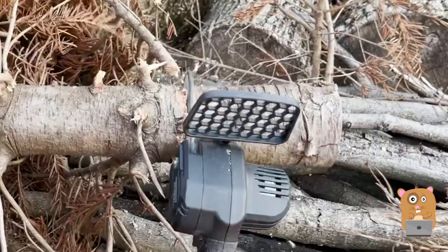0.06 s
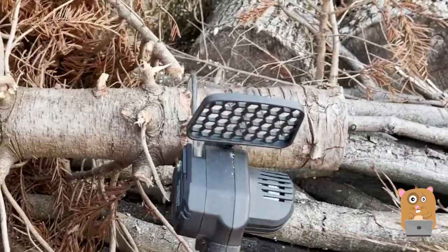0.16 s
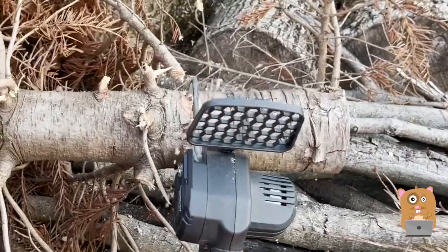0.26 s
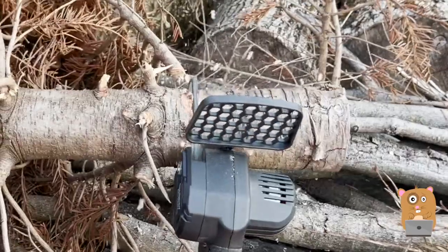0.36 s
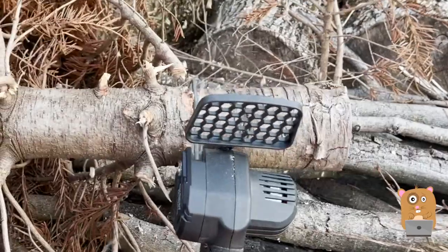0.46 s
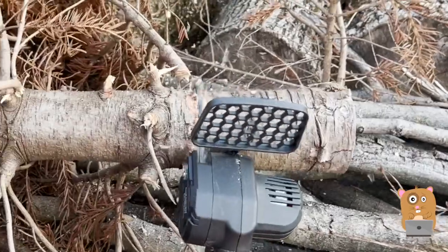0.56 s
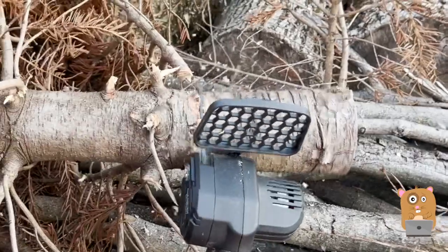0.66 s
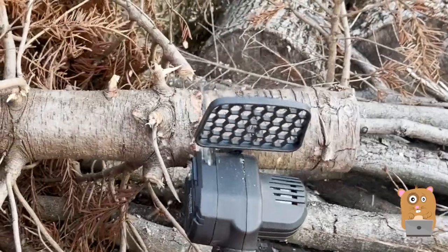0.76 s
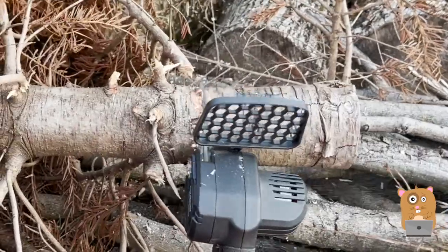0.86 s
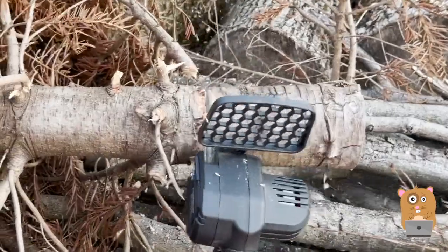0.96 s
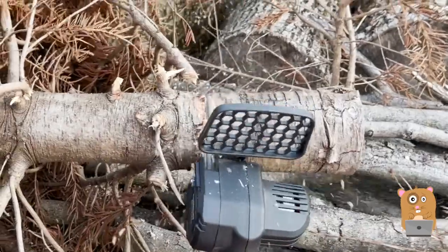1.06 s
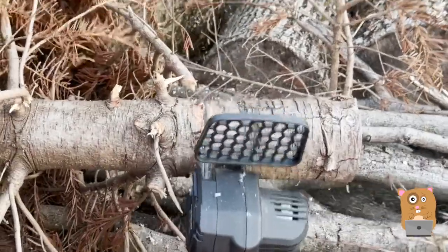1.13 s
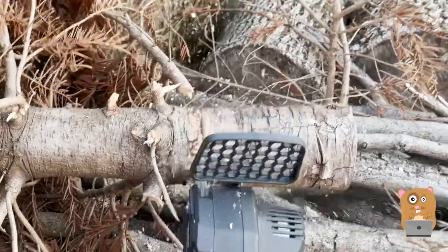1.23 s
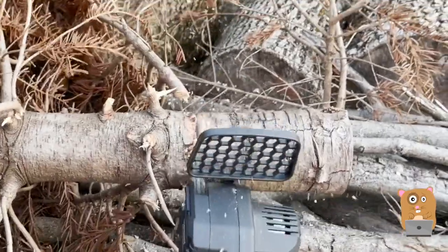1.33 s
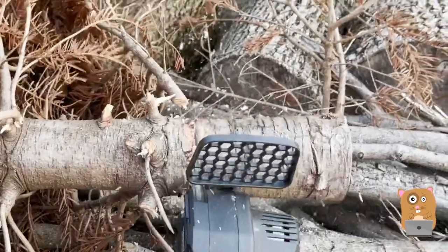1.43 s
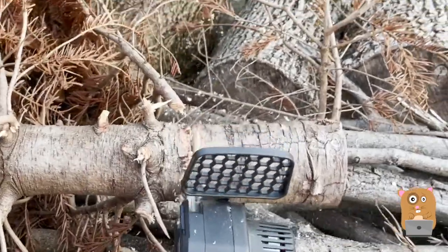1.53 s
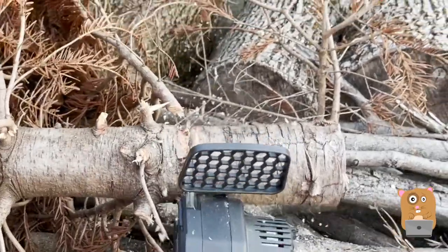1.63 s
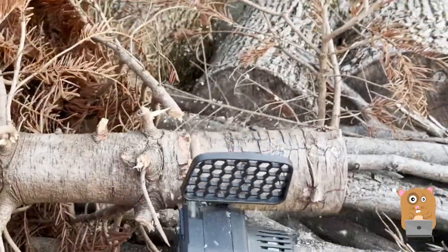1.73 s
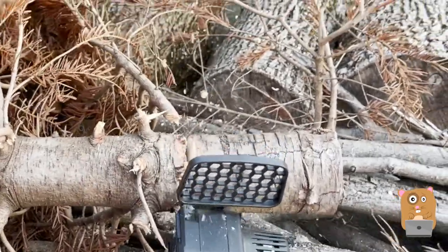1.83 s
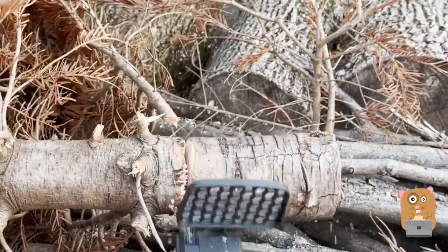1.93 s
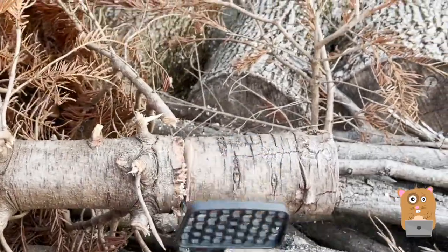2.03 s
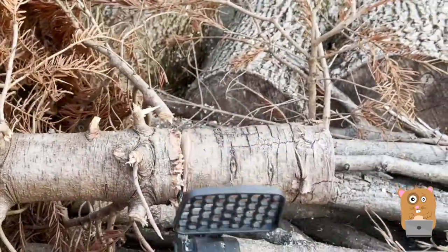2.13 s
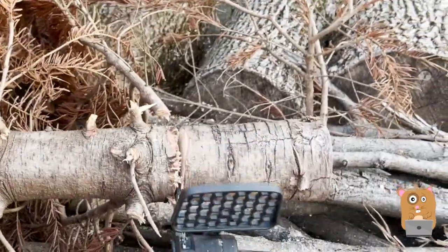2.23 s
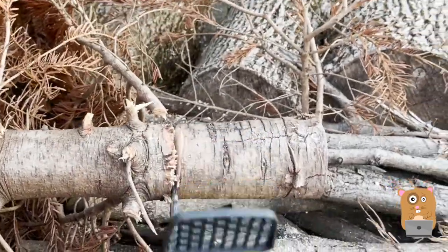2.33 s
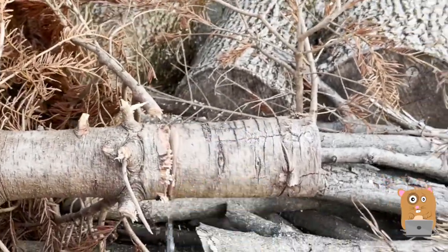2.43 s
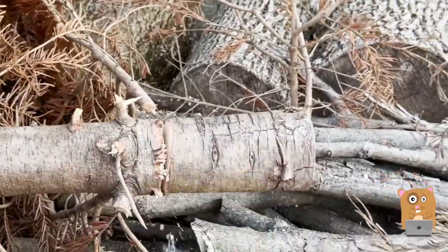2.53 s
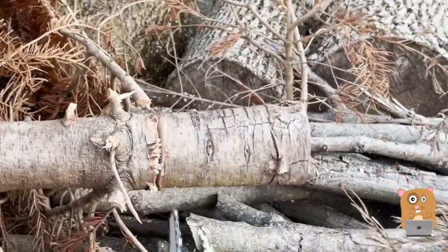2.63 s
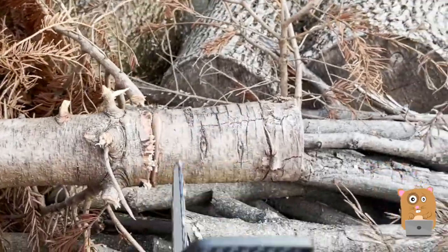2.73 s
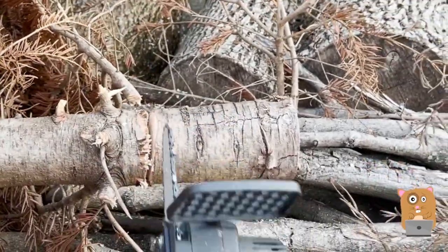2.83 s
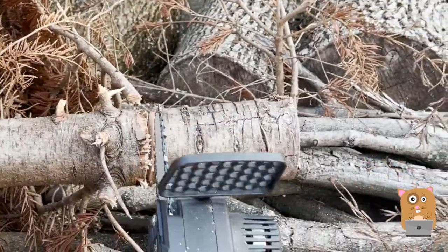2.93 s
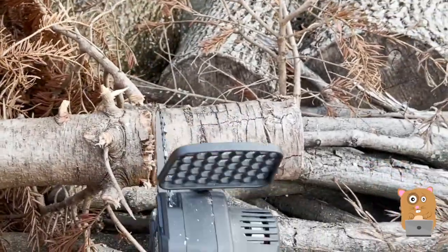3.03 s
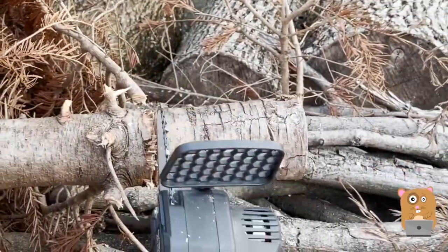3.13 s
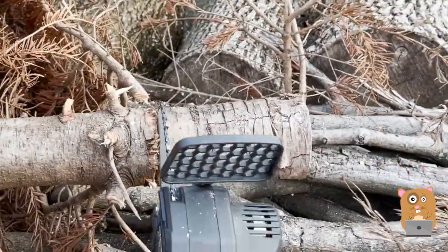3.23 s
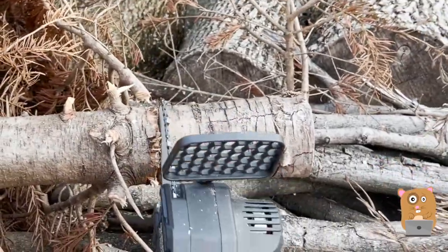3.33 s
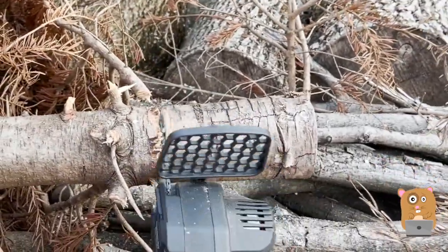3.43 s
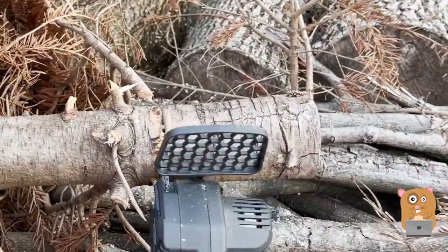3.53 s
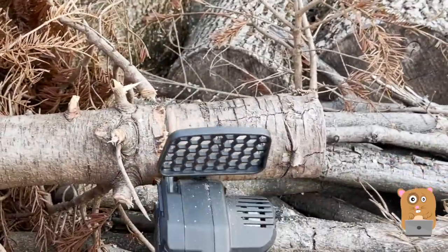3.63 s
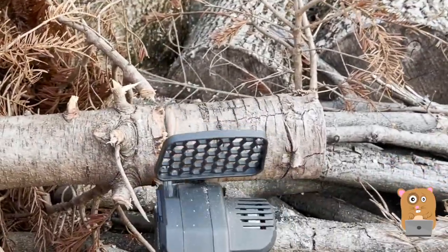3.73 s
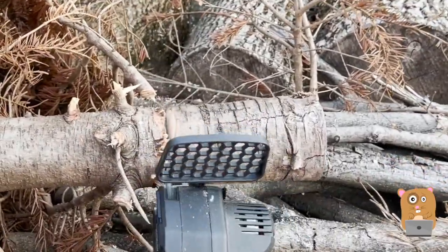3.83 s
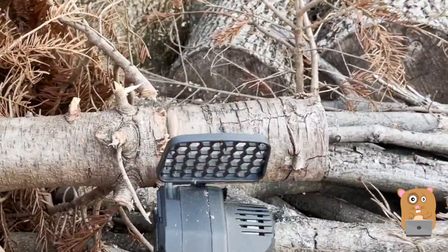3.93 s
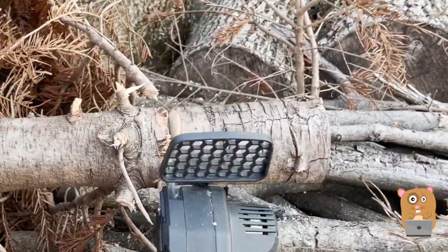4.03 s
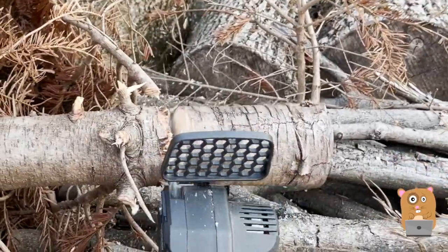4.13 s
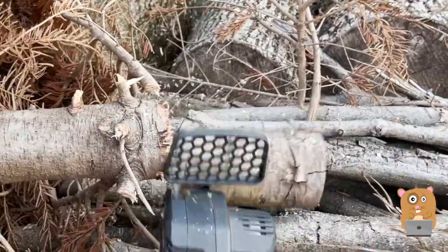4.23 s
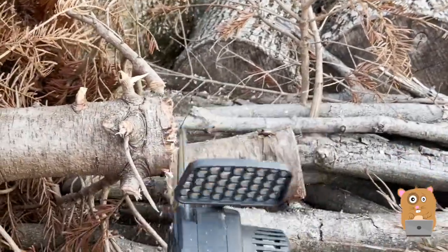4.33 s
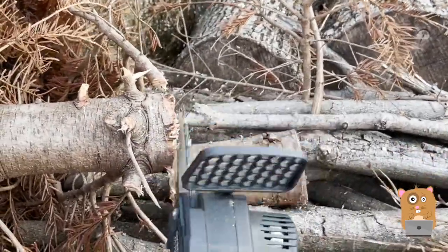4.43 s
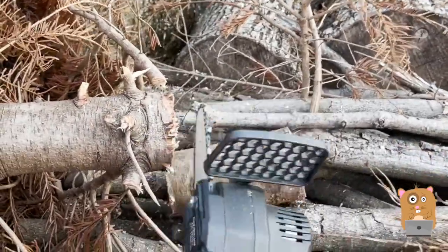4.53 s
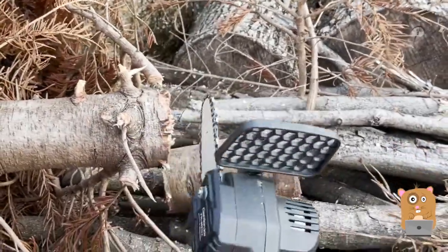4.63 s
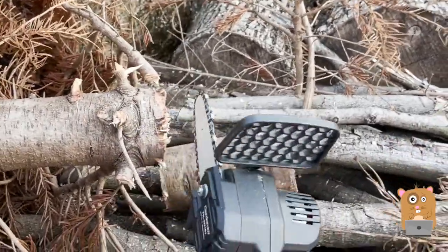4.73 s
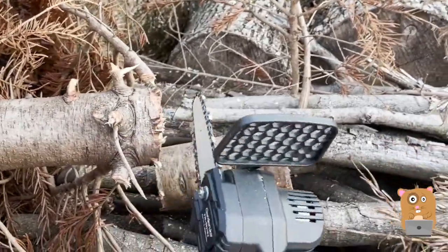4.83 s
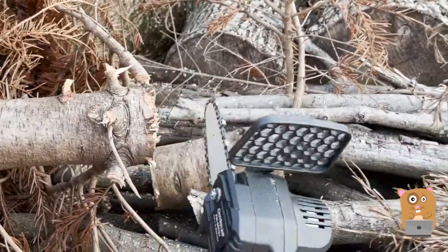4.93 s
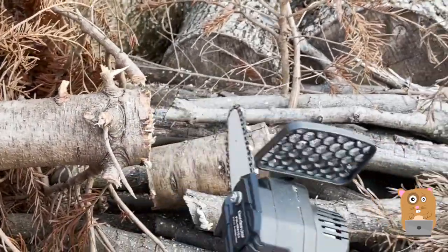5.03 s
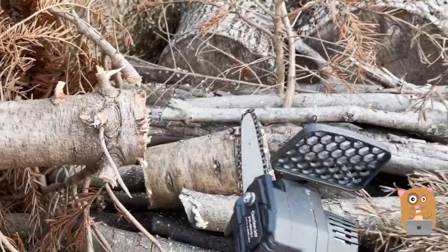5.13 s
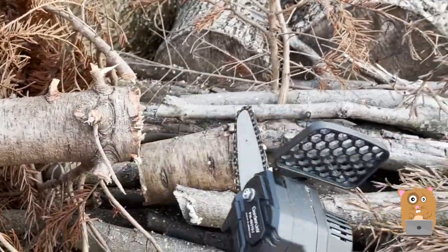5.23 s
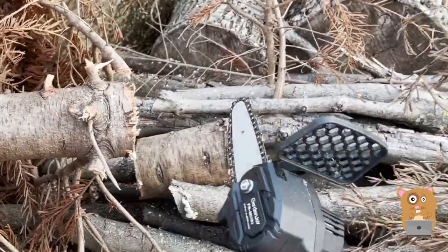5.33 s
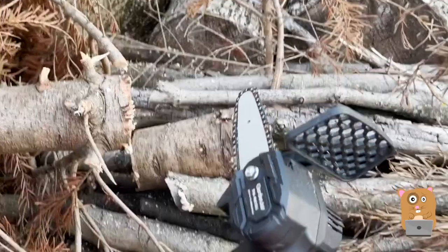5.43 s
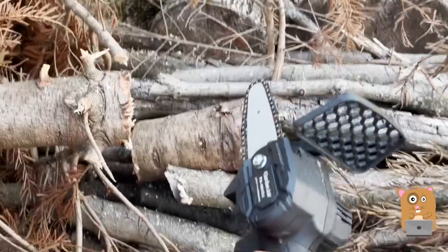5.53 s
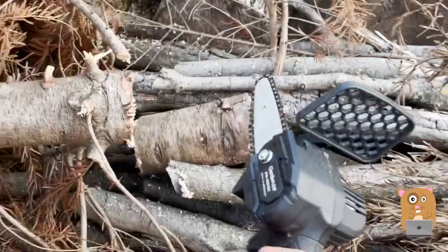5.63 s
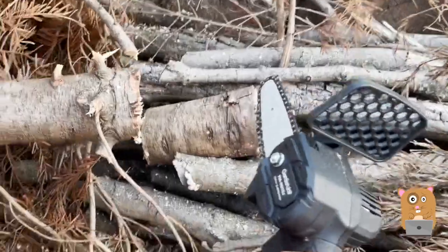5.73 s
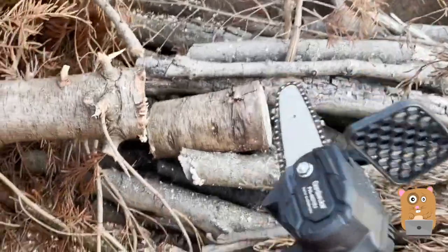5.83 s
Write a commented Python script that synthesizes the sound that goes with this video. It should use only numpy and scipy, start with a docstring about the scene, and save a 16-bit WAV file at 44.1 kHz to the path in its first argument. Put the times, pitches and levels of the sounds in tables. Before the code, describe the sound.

Outdoors, a small electric chainsaw cuts wood, pauses, then cuts briefly again, while gusts thump the microphone and dry twigs crackle.

```python
"""A small battery chainsaw rasps into a log in two bursts, outdoors, close to a phone's microphones.
Its cutters tear off chips, the log drones, the steel bar rings and the gears whine under the load.
Mostly between the bursts, dry twigs and chips tick and rustle. Gusts thump and flutter right on
the two microphone ports, and a faint hiss swells with the breeze behind it all."""
import sys
import numpy as np
from scipy import signal
from scipy.fft import rfft, irfft, next_fast_len
from scipy.io import wavfile
from scipy.ndimage import uniform_filter1d, map_coordinates

SR = 44100
rng = np.random.default_rng(int(sys.argv[2]) if len(sys.argv) > 2 else 0)


def int16_out(signal):
    """Quantize to a 16-bit WAV file."""
    q = np.round(np.clip(np.atleast_2d(signal).T, -1, 1) * 32767)
    wavfile.write(sys.argv[1], SR, q.astype(np.int16))


N = 259308

# The saw, close up. Levels in all tables are relative.
# runs of the chain, the last free once the log parts:
# start/s, stop/s, rasp level/dB, drone over rasp/dB, rumble over rasp/dB
SAW_RUNS = [(-.3, 1.782, -19.5, -11.5, -18), (3.611, 4.17, -18.5, -13, -24.5), (4.1, 4.398, -22, -18, -29)]
# hard bites of a cutter: t/s, level/dB, log knock over it/dB
BITES = [(.0356, 3, 7.5), (.0563, -10, -10), (.0618, 2.5, -10), (.077, -22, 0), (.1272, 3, 7.5),
         (.1594, -14, 0), (.202, -2.5, -1), (.2538, 0, 8), (.2798, -8, -10), (.3017, -21, -15),
         (.344, -21, 12), (.3814, -0.5, 2.5), (.434, -10, -5), (.5324, -4, 3), (.5693, -1.5, 15),
         (.684, -12, 17), (.74, -14, 22), (.95, -16, 21), (1.02, -1, 6.5), (1.1666, -1, -.5),
         (1.229, -1.5, 10), (1.2394, -5, 14), (1.3374, -1, 3), (1.448, -4.5, 13), (1.5259, -12, 11),
         (1.6385, -4, 16), (1.643, -14, 26), (1.6614, -18, -3), (1.7006, -2.5, 4), (1.759, -4.5, 13.5),
         (1.7779, -18, -3.5), (1.806, -19, 24.5), (3.655, -16, 6), (3.7005, -8, 8), (3.715, -18, 22),
         (3.7483, 3, 4), (3.773, -10, 12), (4.068, -7, 13), (4.1415, -3, 2), (4.151, -2, 6.5),
         (4.1844, 1.5, -4), (4.197, -1, -7), (4.2243, -7, -12), (4.2901, -10, -5), (4.388, -7, 4)]
# chain and chips: f/Hz, level/dB
RASP_SPECTRUM = [(350, -45), (650, -12), (1300, -6), (2000, -4), (2800, -9), (4300, -5.5), (6000, -7),
                 (7100, -8.5), (8500, -2.5), (9200, -3.5), (10800, 2.5), (12000, -7.5), (13000, -19.5),
                 (15600, -18)]
# the pile shaking under the log: f/Hz, level/dB
RUMBLE_SPECTRUM = [(120, -18.5), (300, -4.5), (480, 0.5), (650, -17), (1000, -34)]
# resonances of the log with the bar in it: f/Hz, width/Hz, level/dB
LOG_MODES = [(845, 240, 6), (1250, 1700, -6), (1930, 540, -1)]
# resonances of steel bar and housing: f/Hz, width/Hz, level/dB
BAR_MODES = [(2075, 77, 3.5), (3390, 78, -2), (4780, 68, -24), (6400, 100, -7), (8600, 85, 4.5),
             (10600, 100, 1)]
# gear whine sagging with the load, one list a burst: t/s, f/Hz, level/dB
GEAR_WHINE = [
    [(.1, 3930, -45), (.3, 4080, -52), (.52, 4260, -39), (.62, 4060, -31), (.78, 4320, -45),
     (.88, 4660, -27), (.96, 4400, -35), (1.02, 4560, -30), (1.06, 4300, -32), (1.17, 4350, -26.5),
     (1.22, 4100, -28), (1.35, 4310, -35.5), (1.6, 4200, -31), (1.8, 4155, -47)],
    [(3.66, 4500, -40), (3.8, 4320, -42), (4.0, 4360, -36), (4.2, 4670, -36), (4.4, 4400, -53)],
]

# twig and chip ticks: t/s, level/dB, woody part over it/dB
TICKS = [(1.8894, -31, -3), (1.899, -38, -2), (1.9208, -25.5, -6), (1.9374, -40, 19), (1.9674, -37, 2),
         (1.994, -34, 9), (2.031, -34, 14), (2.041, -44, 15), (2.2937, -24.5, -3), (2.3085, -34, 21),
         (2.3135, -35, 21), (2.357, -29, 12), (2.394, -29, 8), (3.0634, -44, 4), (3.133, -29, -5),
         (3.186, -27, 0), (3.2437, -31, 8), (3.2685, -33.5, 26), (3.4074, -24.5, 13), (3.4446, -27.5, 23.5),
         (3.491, -32, -5), (3.5356, -21, -12), (3.605, -24, 2), (4.4723, -31, -9), (5.7974, -52, 32),
         (5.845, -36, 1), (5.8614, -32, 23), (5.8704, -33, 31)]
# dry twigs brushing: t/s, length/s, level/dB, woody level/dB
BRUSHES = [(1.895, 0.054, -50.5, -56), (1.96, 0.049, -52, -54), (2.03, 0.0098, -46, -45),
           (2.305, 0.016, -44, -48), (2.335, 0.078, -45.5, -62), (3.05, .03, -55, -69),
           (3.24, 0.043, -49.5, -56), (3.408, 0.036, -37, -47), (3.443, 0.027, -36, -43.5),
           (3.485, 0.028, -41, -51.5), (3.58, .02, -50, -52), (5.835, 0.037, -44.5, -41)]
# how fast the brushing and its woody part come and go: slope/(dB/s)
BRUSH_EDGES = [
    [900],
    [1200],
]
# snapping twigs: f/Hz, level/dB
TWIG_SPECTRUM = [(600, -18), (1400, 1), (2200, -4.5), (3200, 4.5), (6000, 5.5), (9000, 7), (11000, 16),
                 (13000, -9), (15600, -18)]
# resonances of dry sticks: f/Hz, width/Hz, level/dB
STICK_MODES = [(830, 260, -6), (1400, 520, -2.5), (2140, 200, -2), (3040, 250, -5.5)]

# steady wind on the microphone ports: t/s, thump level/dB, flutter level/dB
STEADY_WIND = [(0, -58, -77), (1.2, -53.5, -73), (1.9, -48, -62), (2.28, -49.5, -59), (2.65, -53, -69),
               (3.46, -37.5, -63), (3.86, -45, -56), (4.5, -41, -47), (5.1, -49, -63), (5.42, -50, -72),
               (5.7, -37, -66), (5.88, -50, -64)]
# gusts: t/s, length/s, thump level/dB, flutter level/dB
GUSTS = [(0.08, 0.17, -52, -68), (0.79, 0.06, -39.5, -57), (1.04, 0.081, -45, -60), (1.22, 0.055, -40, -67),
         (1.45, 0.11, -52, -59), (1.62, 0.23, -44, -43), (1.93, 0.16, -39, -51.5),
         (2.17, 0.049, -56, -59.5), (2.34, 0.036, -40.5, -59), (2.39, 0.098, -32, -40.5),
         (2.52, 0.025, -36, -45.5), (2.595, 0.1, -31, -44), (2.73, 0.015, -28.5, -61),
         (2.77, 0.067, -32, -35.5), (2.9, 0.098, -29.5, -36.5), (3.03, 0.03, -40, -57),
         (3.075, 0.026, -46, -45), (3.155, 0.075, -29, -37.5), (3.23, 0.049, -29, -39),
         (3.315, 0.025, -41, -44), (3.37, 0.066, -27.5, -45.5), (3.46, 0.04, -40, -48),
         (3.53, 0.06, -37, -38), (3.62, 0.064, -32.5, -43.5), (3.79, 0.04, -38, -51),
         (3.88, 0.06, -34, -45), (3.98, 0.07, -29, -51), (4.09, 0.11, -27, -45), (4.28, 0.06, -33.5, -46),
         (4.4, 0.052, -31, -51), (4.52, 0.071, -50, -56), (4.66, 0.05, -32.5, -50), (4.74, 0.023, -36, -41),
         (4.79, 0.019, -29, -55), (4.83, 0.08, -31.5, -40), (4.97, 0.095, -41, -38),
         (5.1, 0.024, -26.5, -30), (5.15, 0.045, -24.5, -36), (5.21, 0.067, -30, -48),
         (5.3, 0.073, -33.5, -55), (5.47, 0.025, -36, -63), (5.54, 0.15, -30, -32), (5.7, 0.036, -38, -52),
         (5.8, 0.03, -41, -66)]
# how fast thump and flutter come and go: slope/(dB/s)
GUST_EDGES = [
    [600],
    [2006],
]
# deep wind pressure: f/Hz, level/dB
THUMP_SPECTRUM = [(12, -44), (20, -22), (47, 5), (70, 6), (199, -4), (260, -11), (340, -13), (570, -120)]
# fluttering wind pressure: f/Hz, level/dB
FLUTTER_SPECTRUM = [(110, -10), (180, 3.5), (354, 1.5), (492, -9.5), (613, -11), (1600, -33.5), (2080, -55),
                    (3520, -120)]
# eddies that slap the ports: t/s, level/dB, slowing time/s, t60/s
SLAPS = [(2.397, -28.5, 0.0013, 0.057), (2.4194, -24.5, 0.0032, 0.087), (2.439, -13.5, 0.019, 0.018),
         (2.4578, -18.5, 0.0024, 0.061), (2.489, -31.5, .0012, 0.067), (2.535, -30.5, 0.0015, 0.078),
         (2.6016, -30.5, 0.0013, 0.08), (2.6331, -23, 0.0013, 0.16), (2.647, -35, 0.003, 0.13),
         (2.686, -35, 0.0016, 0.11), (2.737, -31, 0.00086, 0.17), (2.774, -26, 0.0036, 0.1),
         (2.782, -23.5, 0.0042, 0.18), (2.7982, -21.5, 0.0023, .07), (2.829, -24, 0.019, 0.02),
         (2.919, -17, 0.0022, 0.039), (2.9522, -18.5, 0.0014, 0.017), (2.98, -25.5, 0.0019, 0.084),
         (3.082, -29.5, 0.0012, 0.083), (3.1622, -16.5, 0.0029, 0.015), (3.1688, -23, 0.0026, .04),
         (3.2035, -12.5, 0.00094, 0.036), (3.2681, -26, 0.0018, .08), (3.3272, -32.5, 0.0013, 0.041),
         (3.3768, -13, 0.001, 0.027), (3.4093, -23, 0.0013, 0.052), (3.6298, -24.5, 0.0018, 0.16),
         (3.911, -23, 0.0016, 0.093), (4.0067, -22.5, 0.0017, 0.077), (4.2201, -20, 0.0013, 0.02),
         (4.297, -16.5, 0.0024, 0.078), (4.4118, -25, 0.0011, 0.12), (4.5349, -27, 0.0023, 0.011),
         (4.676, -33.5, 0.0017, 0.11), (4.7479, -28.5, 0.0012, .11), (4.7928, -36.5, 0.007, 0.14),
         (4.845, -25, 0.0026, 0.06), (4.8832, -29.5, 0.0016, 0.084), (4.897, -25.5, 0.0015, 0.066),
         (4.9227, -26, 0.001, 0.044), (4.98, -32, .003, .05), (5.025, -23, 0.014, 0.033),
         (5.045, -21, 0.0012, 0.087), (5.1115, -16, .0017, 0.022), (5.1672, -19, .002, 0.015),
         (5.218, -28.5, .002, .07), (5.551, -22, 0.0019, 0.093), (5.5926, -15.5, 0.0024, .13),
         (5.579, -30, .003, 0.024), (5.618, -15, 0.001, 0.0087), (5.6362, -13.5, .0017, 0.0037),
         (5.6465, -13.5, 0.0016, 0.028), (5.6715, -14, .0019, 0.017)]

# background hiss swelling with the breeze: t/s, level/dB
BREEZE = [(0, -55.5), (1.9, -53), (3.1, -50.5), (4.5, -51), (5.5, -48.5), (5.88, -51)]
# background hiss shared by both ports, cut off near 12 kHz by the phone's audio coding: f/Hz, level/dB
SHARED_HISS_SPECTRUM = [(300, 13), (800, -23), (2200, 3.5), (4000, -3.5), (7000, -2), (9000, 0),
                        (10500, -1.5), (11600, -3.5), (11900, -60)]
# each port's own hiss: f/Hz, level/dB
PORT_HISS_SPECTRUM = [(300, 6.5), (1200, 3), (3000, -4), (7000, -9), (9000, -35), (12200, -60)]

# phase shift across the phone's body: f/Hz, lead of the left port/cycles
PORT_LEAD = [(0, 0), (2200, 0), (3100, .15), (5000, .05), (6800, 0), (7500, .13), (8700, 0), (10200, -.5),
             (11800, -1), (12600, -1), (13300, -1.5), (14200, -1.5), (15000, -2), (22050, -2)]
# balance of the ports: f/Hz, left over right/dB
PORT_TILT = [(200, 1.5), (700, -0.5), (1300, -2.5), (2400, 1.5), (4400, 2.5), (7000, 2), (8500, 0)]
# scattered sound, in which the ports differ: f/Hz, level/dB
SCATTER_SPECTRUM = [(100, -22), (400, -12.5), (1000, -11), (1900, -28), (3000, -4.5), (5000, -9),
                    (6200, -16), (7300, 0), (8500, -36.5), (9300, 3.5), (10200, -9), (11500, -1),
                    (13600, -30)]

SPIN_UP_S, COAST_S, COAST_LAW = 0.046, 0.081, 1.68  # the chain slows to rest by this power
NICKS_PER_S, NICK_DB, STEEL_DB = 130, 3, -16.5  # levels against the rasp
SMALL_EDDY_HZ, SMALL_EDDY_S, EDDY_LAW = 1146, .0015, 0.318  # a slower eddy starts lower, by this power
LOW_CUT_HZ, TOP_HZ = 36.2, 15900  # the phone's band


def saw():
    """Chips tear off in a dense spray that swells with every cutter; log, pile and bar sound with it."""
    swell = .76 + .42 * abs(cutter_throb(per_s=58, scatter=.2, t60=.045))
    spray = amp(0.76 * wobble(1500) + 1.2 * wobble(200)) * noise()
    rasp = coloured(wood_grain(swell * spray, depth_db=1.46), RASP_SPECTRUM)
    drone = unit(ringing(swell * amp(1.7 * wobble(29.8)) * noise(), LOG_MODES))
    rumble = coloured(swell * amp(0.79 * wobble(18)) * noise(), RUMBLE_SPECTRUM)
    steel = amp(STEEL_DB) * unit(ringing(swell * noise(), BAR_MODES))
    chain_gain, log_gain, pile_gain = chain_gains()
    return chain_gain * (rasp + steel + nicks()) + log_gain * drone + pile_gain * rumble + bites()


def chain_gains():
    """Gains of rasp, drone and rumble: the chain spins up, holds and coasts to rest."""
    gains, t = np.zeros((3, N)), np.arange(N) / SR
    for start, stop, db, drone_db, rumble_db in SAW_RUNS:
        spin_up = 1 - np.exp(-np.maximum(t - start, 0) / SPIN_UP_S)
        coast = np.clip(1 - (t - stop) / COAST_S, 0, 1) ** COAST_LAW
        gains = np.maximum(gains, amp(db + np.c_[[0, drone_db, rumble_db]]) * spin_up * coast)
    return gains * amp(0.13 * wobble(6.05))


def cutter_throb(per_s, scatter, t60):
    """Uneven swells: each cutter meets the wood late or early, hard or soft."""
    lateness, force_db = rng.standard_normal((int(N / SR * per_s), 2)).T
    at = (np.arange(len(lateness)) + scatter * lateness) * SR / per_s
    kicks = np.bincount(np.clip(at, 0, N - 1).astype(int), amp(force_db), N)
    t = np.arange(SR // 10) / SR
    shape = amp(-60 * t / t60) * (1 - np.exp(-t / 0.0041))
    return unit(signal.fftconvolve(kicks, shape)[:N])


def wood_grain(x, depth_db):
    """Patches of pitch and time grow louder or softer as the grain of the wood changes."""
    spectra = signal.stft(x, nperseg=512)[2]
    patches = uniform_filter1d(rng.standard_normal(spectra.shape), size=3, axis=0)
    patches = uniform_filter1d(patches, size=5, axis=1)
    return signal.istft(spectra * amp(depth_db * unit(patches)), nperseg=512)[1][:N]


def bites():
    """A cutter bites hard: a crack, and a knock that rings the log."""
    crack, knock = bursts(BITES, rise=0.004, t60=0.017)
    return crack * coloured(noise(), RASP_SPECTRUM) + ringing(knock * noise(), LOG_MODES)


def nicks():
    """Single teeth nick the wood in short random cracks."""
    kicks = (rng.random(N) < NICKS_PER_S / SR) * amp(NICK_DB + 1.52 * noise())
    t = np.arange(SR // 50) / SR
    envelope = signal.fftconvolve(kicks, amp(-60 * t / 0.007))[:N]
    return envelope * coloured(noise(), RASP_SPECTRUM)


def gear_whine():
    """The gear mesh sings, rough in pitch and strength."""
    hz = np.maximum(curve(GEAR_WHINE), 0) + 30 * wobble(60) + 55 * wobble(400)
    gain = amp(curve(GEAR_WHINE, column=2) + 2.2 * wobble(110))
    return gain * np.sin(2 * np.pi * np.cumsum(hz) / SR)


def twigs():
    """Dry twigs brush in clumps of tiny snaps and tick singly; the sticks ring with both."""
    snaps = amp(2.2 * wobble(900) + 3.6 * wobble(90)) * noise()
    tick, knock = bursts(TICKS, rise=0.00098, t60=0.0099)
    ticks = tick * coloured(noise(), TWIG_SPECTRUM) + ringing(knock * noise(), STICK_MODES)
    brush, woody = swells(BRUSHES, BRUSH_EDGES)
    return brush * coloured(snaps, TWIG_SPECTRUM) + woody * unit(ringing(snaps, STICK_MODES)) + ticks


def wind():
    """Wind right on the microphones: thump, flutter and slaps, slightly louder on the left."""
    steady = amp([curve([STEADY_WIND]), curve([STEADY_WIND], column=2)])
    thump_gain, flutter_gain = np.hypot(swells(GUSTS, GUST_EDGES), steady)
    thump = buffet(THUMP_SPECTRUM, amp(2.0 * wobble(15)), unshared=0.54)
    flutter = small_eddies() + .8 * buffet(FLUTTER_SPECTRUM, amp(3 * wobble(60)), unshared=.55)
    return amp([[.3], [-.3]]) * (thump_gain * thump + flutter_gain * flutter + slaps())


def buffet(spectrum, lumps, unshared):
    """Lumpy pressure noise, mostly common to both ports."""
    common, own = noise(), rng.standard_normal((2, N))
    return coloured(lumps * (common + unshared * own), spectrum)


def small_eddies():
    """Many small eddies of three sizes pass at random, each stronger at one port or the other."""
    flutter, per_s = np.zeros((2, N)), 50
    for slowing, t60 in [(0.0089, 0.019), (0.0026, 0.077), (0.0014, 0.17)]:
        kicks = (rng.random(N) < per_s / SR) * noise() * amp(rng.normal(0, 3, (2, N)))
        flutter += signal.fftconvolve(kicks, eddy(slowing, t60)[None], axes=1)[:, :N]
    return unit(flutter)


def slaps():
    """Single strong eddies hit the ports; each port feels the swirl a little differently."""
    pressure = np.zeros((2, N + SR))
    ragged_cycles = .06 * np.array([wobble(250), wobble(250)])
    for start, db, slowing, t60 in SLAPS:
        at = round(start * SR)
        span = slice(at, at + SR // 6)
        pressure[:, span] += amp(db) * eddy(slowing, t60, ragged_cycles[:, span])
    return pressure[:, :N]


def eddy(slowing, t60, ragged_cycles=0):
    """A swirl slows as it grows: its pitch falls as one over time."""
    t = np.arange(SR // 6) / SR
    start_hz = SMALL_EDDY_HZ * (SMALL_EDDY_S / slowing) ** EDDY_LAW
    cycles = start_hz * slowing * np.log(1 + t / slowing) + ragged_cycles
    shape = amp(-60 * t / t60) * (1 - np.exp(-t / 0.0017)) ** 2
    return np.sin(2 * np.pi * cycles) * shape / shape.max()


def hiss():
    """A soft background hiss follows the breeze, partly shared by the ports and partly each one's own."""
    shared = ports(coloured(noise(), SHARED_HISS_SPECTRUM))
    own = coloured(rng.standard_normal((2, N)), PORT_HISS_SPECTRUM)
    return 0.78 * amp(curve([BREEZE])) * (shared + own)


def ports(x):
    """A sound in the air reaches two ports: shifted, tilted, and partly scrambled by shifting litter."""
    side = np.array([[1], [-1]])
    tilt = lambda hz: amp(side * along(PORT_TILT, hz) / 2)
    shift = lambda hz: np.exp(1j * np.pi * side * np.interp(hz, *np.transpose(PORT_LEAD)))
    direct = filtered(x, lambda hz: tilt(hz) * shift(hz))
    spectra = signal.stft(x, nperseg=256)[2]
    random_phase = np.exp(2j * np.pi * rng.random(spectra.shape))
    scattered = signal.istft(spectra * random_phase, nperseg=256)[1][:N]
    return direct + side * filtered(scattered, lambda hz: amp(along(SCATTER_SPECTRUM, hz)))


def bursts(rows, rise, t60):
    """Two envelopes of short puffs: one at each row's level, one with its offset added."""
    envelopes, t = np.zeros((2, N + SR)), np.arange(SR // 20) / SR
    shape = amp(-60 * t / t60) * (1 - np.exp(-t / rise))
    for start, db, offset_db in rows:
        at = round(start * SR)
        envelopes[:, at:at + len(t)] += amp([[db], [db + offset_db]]) * shape
    return envelopes[:, :N]


def swells(rows, edge_db_per_s):
    """Gains for the two level columns: each row climbs, holds for its length and sinks."""
    power, t = np.zeros((2, N)), np.arange(N) / SR
    for start, length, *db in rows:
        near = slice(max(round((start - .15) * SR), 0), round((start + length + .15) * SR))
        away = np.maximum(0, np.maximum(start - t[near], t[near] - start - length))
        power[:, near] += amp(np.c_[db] - edge_db_per_s * away) ** 2
    return np.sqrt(power)


def ringing(x, modes):
    """Resonances struck by x, alternating in sign."""
    def response(hz):
        return sum((-1) ** k * amp(db) * 1j * hz * width / (centre ** 2 - hz ** 2 + 1j * hz * width)
                   for k, (centre, width, db) in enumerate(modes))
    return filtered(x, response)


def coloured(x, spectrum):
    """x given a spectrum, at rms 1."""
    return unit(filtered(x, lambda hz: amp(along(spectrum, hz))))


def filtered(x, response):
    """x times a complex response of frequency."""
    size = next_fast_len(N + SR // 4)
    return irfft(rfft(x, size) * response(np.fft.rfftfreq(size, 1 / SR)), size)[..., :N]


def curve(tables, column=1):
    """One value of the column per sample; -120 outside the tables."""
    values, t = np.full(N, -120.), np.arange(N) / SR
    for rows in map(np.array, tables):
        on = (t >= rows[0, 0]) & (t <= rows[-1, 0])
        values[on] = np.interp(t[on], rows[:, 0], rows[:, column])
    return values


def along(points, hz):
    """(Hz, value) points joined on a log axis."""
    point_hz, values = np.transpose(points)
    return np.interp(np.log(hz + 1), np.log(point_hz + 1), values)


def wobble(rate):
    """A smooth random curve, rate knots a second."""
    return map_coordinates(rng.standard_normal(int(N * rate / SR) + 4), [np.arange(N) * rate / SR])


def noise():
    return rng.standard_normal(N)


def amp(db):
    return 10 ** (np.asarray(db) / 20)


def unit(x):
    return x / np.sqrt(np.mean(x ** 2) + 1e-20)


def scene():
    """Saw and twigs come through the air; the wind strikes the ports directly, over the hiss."""
    return ports(saw() + gear_whine() + twigs()) + wind() + hiss()


def record(dry):
    """The phone thins the deep bass and keeps nothing above its band limit."""
    low_cut = lambda hz: (1j * hz / (LOW_CUT_HZ + 1j * hz)) ** 2
    high_cut = lambda hz: np.clip((TOP_HZ - hz) / 150, 0, 1) ** 2
    return filtered(dry, lambda hz: low_cut(hz) * high_cut(hz))


dry = scene()
out = record(dry)
int16_out(out)
```